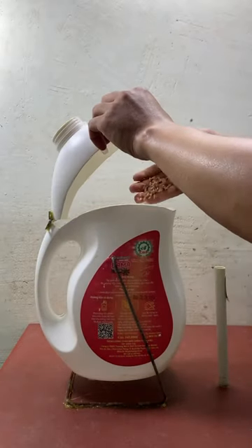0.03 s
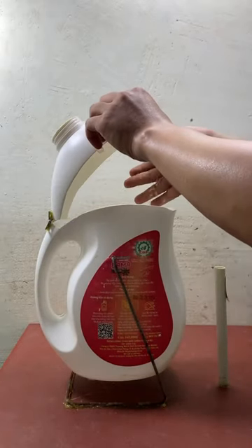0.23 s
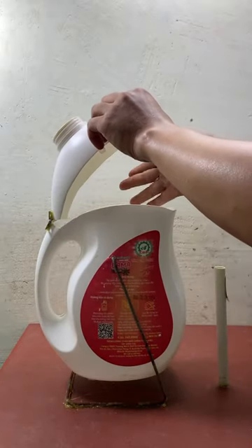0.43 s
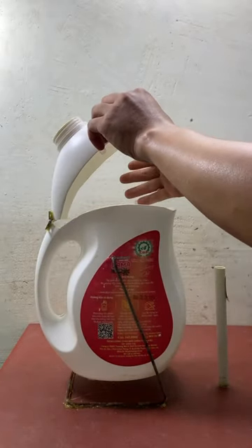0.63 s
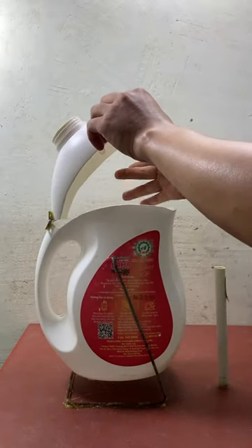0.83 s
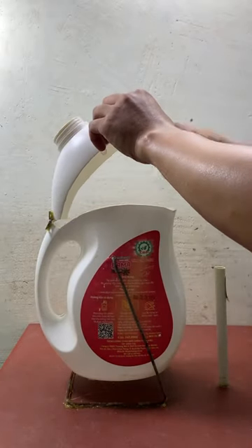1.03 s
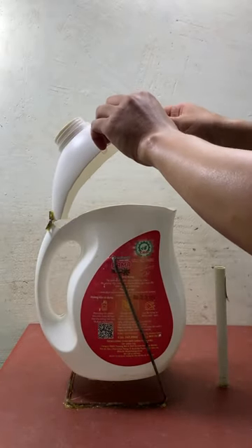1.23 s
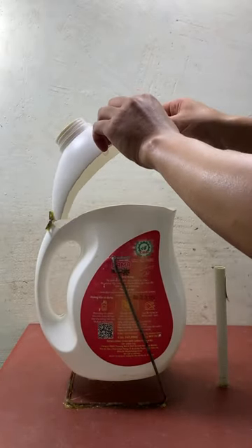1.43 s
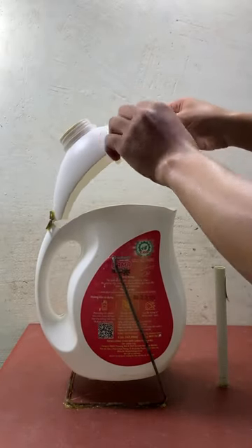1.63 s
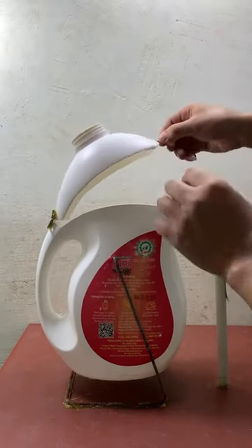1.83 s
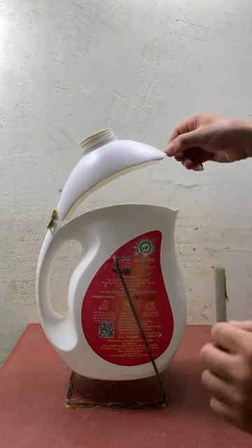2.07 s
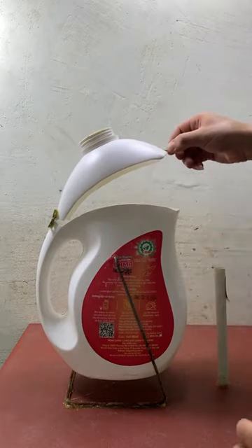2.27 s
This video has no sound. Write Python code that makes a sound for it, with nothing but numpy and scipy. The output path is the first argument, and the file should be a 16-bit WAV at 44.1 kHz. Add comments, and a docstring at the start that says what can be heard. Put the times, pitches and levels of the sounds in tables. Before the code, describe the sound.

At about 0.2 seconds, a handful of hard grains clatters into a hollow plastic bottle, loudest around 0.3 to 0.4 seconds. The rattle fades by 0.7, and a few last grains drop and bounce until about 1.1. Fingers then faintly brush and tap the plastic, with a last tiny tick near 2.2 seconds. A dull arm rustle and low rumble lie underneath in the bare room.

```python
"""A handful of hard grains is tipped into a hollow plastic bottle in a bare room. Each impact is
a short broadband pulse that excites the modes of the shell and of the enclosed air; the growing
heap damps the shell, and a few stragglers drop and bounce. Fingers then brush and tap the
plastic faintly, over a dull rustle of arms and a low background rumble."""
import sys
import numpy as np
from scipy import signal
from scipy.fft import rfft, irfft, next_fast_len
from scipy.io import wavfile
from scipy.ndimage import map_coordinates

SR = 44100
rng = np.random.default_rng(int(sys.argv[2]) if len(sys.argv) > 2 else 0)


def inscribe(sig):
    """Save sig as 16-bit PCM at rate SR to the path in sys.argv[1].

    A 1-D sig is mono; a 2-D sig holds one channel per row.
    Samples are clipped to [-1, 1] before scaling.
    """
    pcm = np.round(np.clip(np.atleast_2d(sig).T, -1, 1) * 32767)
    wavfile.write(sys.argv[1], SR, pcm.astype(np.int16))


N = 101429
TOP_HZ = 15700


def amp(db):
    """Amplitude ratio of a level in decibels."""
    return 10 ** (np.asarray(db) / 20)


def unit(x):
    """Normalisation to rms 1."""
    return x / np.sqrt(np.mean(x ** 2) + 1e-20)


def along(points, hz):
    """Interpolation of (frequency, value) points on a log frequency axis."""
    freqs, values = np.transpose(points)
    return np.interp(np.log(hz + 1), np.log(freqs + 1), values)


def curve(points):
    """Linear interpolation of (time, value) points at every sample."""
    return np.interp(np.arange(N) / SR, *np.transpose(points))


def wobble(rate):
    """Slow random modulation: a spline through `rate` knots a second."""
    return map_coordinates(rng.standard_normal(N // 100), [np.arange(N) * rate / SR], mode="mirror")


def filtered(x, response):
    """Linear filtering: the spectrum times a complex frequency response."""
    size = 2 * next_fast_len(N // 2 + 4096)
    return irfft(rfft(x, size) * response(np.fft.rfftfreq(size, 1 / SR)), size)[..., :x.shape[-1]]


def colour(x, points):
    """Minimum-phase filtering by (frequency, gain) points: a folded cepstrum makes it causal."""
    def response(hz):
        cepstrum = irfft(np.log(amp(along(points, hz))))
        half = len(cepstrum) // 2
        cepstrum[1:half] *= 2
        cepstrum[half + 1:] = 0
        return np.exp(rfft(cepstrum))
    return filtered(x, response)


def resonate(x, modes):
    """Modal superposition: x drives damped second-order resonators in parallel."""
    return filtered(x, lambda f: sum(amp(db) * 1j * f * width / (hz * hz - f * f + 1j * f * width)
                                     for hz, width, db in modes))


def pair(x, correlation):
    """Partial coherence: two independent signals mix as mid and side to a left-right correlation."""
    def weights(hz):
        angle = np.arccos(np.clip(along(correlation, hz), -1, 1)) / 2
        return np.array([np.cos(angle), np.sin(angle)])
    mid, side = filtered(x, weights)
    return np.array([mid + side, mid - side])


# Spectrum of the rumble (frequency [Hz], relative level [dB])
RUMBLE_SPECTRUM = [(15, -44), (28, -19.5), (38, -7), (50, -0.5), (85, -5), (122, -23.5), (160, -13),
                   (220, -10.5), (300, -16), (430, -22), (650, -28), (1400, -42.5), (2500, -58.5),
                   (6000, -66), (13000, -66), (15000, -74.5)]
# Coherence of the rumble (frequency [Hz], left-right correlation [-])
RUMBLE_COHERENCE = [(50, 0.97), (150, 0.9), (400, 0.92), (1200, 0.33), (3000, .2), (10000, 0.15)]
# Partials of a distant drone (frequency [Hz], level [dB])
DRONE_PARTIALS = [(49, -56.5), (158, -67)]

def background(rumble_db=-54):
    """Low-frequency noise, with a drone that wavers by amplitude and phase modulation."""
    t = np.arange(N) / SR
    rumble = unit(pair(colour(rng.standard_normal((2, N)), RUMBLE_SPECTRUM), RUMBLE_COHERENCE))
    drone = sum(amp(db + 2 * wobble(12)) * np.sqrt(2) * np.sin(2 * np.pi * hz * t + 0.66 * wobble(7))
                for hz, db in DRONE_PARTIALS)
    return amp(rumble_db) * rumble + drone


# Decay of the bare room (frequency [Hz], reverberation time T60 [s])
ROOM_T60 = [(200, 0.5), (800, 0.41), (2000, .6), (4000, .65), (8000, 0.49), (14000, .4)]
# Coherence of the reverberant field (frequency [Hz], left-right correlation [-])
ROOM_COHERENCE = [(200, .75), (350, 0.088), (800, .85), (1300, .45), (2500, -.2), (4500, 0.28),
                  (7000, 0.78), (13000, .4)]

def room(x):
    """Reverberation: convolution with a noise tail that decays exponentially, each band at its rate."""
    hz, t, bands = signal.stft(rng.standard_normal((2, SR)), SR, nperseg=256)
    decay = amp(-60 * t / along(ROOM_T60, hz)[:, None])
    tail = pair(signal.istft(bands * decay, SR, nperseg=256)[1], ROOM_COHERENCE)
    tail = np.pad(tail / np.linalg.norm(tail[0]), ((0, 0), (SR // 400, 0)))  # 2.5 ms pre-delay
    return signal.fftconvolve(x[None], tail, axes=1)[:, :N]


# Envelope of the arm rustle (time [s], level [dB])
ARM_ENVELOPE = [(0, -61.5), (.6, -61), (1.0, -64.5), (1.2, -60), (1.5, -61), (1.75, -62), (1.95, -69.5),
                (2.3, -69.5)]
# Spectrum of the arm rustle (frequency [Hz], relative level [dB])
ARM_SPECTRUM = [(120, -29.5), (220, 3), (330, -2.5), (600, -11.5), (1500, -31), (3000, -47), (8000, -69)]

def arms():
    """Amplitude-modulated low noise: the dull rustle of moving arms."""
    return amp(curve(ARM_ENVELOPE)) * unit(colour(rng.standard_normal((2, N)), ARM_SPECTRUM))


WALL_T60_S, TICK_RISE_S = .035, 0.00044
ECHO_WEIGHT, ECHO_T60_S = 3, .028
SNAP_WEIGHT, SNAP_T60_S = 8.6, 0.0045

def ticks(count, samples=1024, modes=10):
    """Impulse responses of unit energy, one a contact: local wall modes, inner echoes and a snap."""
    t = np.arange(samples) / SR
    hz = rng.uniform(0, TOP_HZ, (count, modes))
    phase = (2 * np.pi * hz[..., None] * t).astype(np.float32)
    wall = np.cos(phase).sum(1) * amp(-60 * t / WALL_T60_S)
    echoes = ECHO_WEIGHT * rng.standard_normal((count, samples)) * amp(-60 * t / ECHO_T60_S)
    snap = SNAP_WEIGHT * rng.standard_normal((count, samples)) * amp(-60 * t / SNAP_T60_S)
    pulses = (wall + echoes + snap) * (1 - np.exp(-t / TICK_RISE_S))
    return pulses / np.linalg.norm(pulses, axis=1, keepdims=True)


def place(times, gains, pulses):
    """Superposition of pulses, each at its own time and gain."""
    at = np.round(times * SR).astype(int)[:, None] + np.arange(pulses.shape[1])
    return np.bincount(at.ravel(), (gains[:, None] * pulses).ravel(), N)[:N]


# Spectral shaping of a contact on the wall (frequency [Hz], gain [dB])
TICK_SPECTRUM = [(120, -31), (200, -16), (300, -5), (600, -1.5), (1000, 0.5), (2000, 1), (3000, 2.5),
                 (4200, 2), (5200, 0.5), (7500, 2), (9500, -5.5), (12000, -4), (13800, -9), (15200, -31.5)]
# Spectral shaping of the ringing, thinned below 200 Hz and above 4 kHz (frequency [Hz], gain [dB])
RING_SPECTRUM = [(130, -28), (215, 0), (3500, 0.5), (12000, -17)]

def bottle(times, gains, rings):
    """Impact excitation: contacts tick and drive each (modes, dB per contact); two sides radiate."""
    def side():
        pulses = ticks(len(times))
        ringing = np.zeros(N)
        for modes, drive_db in rings:
            ringing += resonate(place(times, gains * amp(drive_db), pulses), modes)
        return colour(place(times, gains, pulses), TICK_SPECTRUM) + colour(ringing, RING_SPECTRUM)
    return np.array([side(), side()])


# Envelope of skin sliding on plastic (time [s], level [dB])
BRUSH_ENVELOPE = [(0, -90), (.08, -87), (.13, -91), (.19, -90), (.3, -82), (.95, -78), (1.08, -78.5),
                  (1.2, -82), (1.35, -76.5), (1.43, -89), (1.66, -93), (1.72, -86), (1.85, -93),
                  (1.98, -86.5), (2.1, -91.5), (2.3, -91)]
# Spectrum of that friction (frequency [Hz], relative level [dB])
BRUSH_SPECTRUM = [(300, -7.5), (1500, 7.5), (3500, 0), (5000, 2), (7500, -3), (12000, -2.5), (15000, -10)]
# Fingertip impacts, the two 3400 Hz rows near 1.72 s a brief scrape played alike (time [s], relative level
# [dB], centre frequency [Hz])
FINGER_TAPS = [(1.124, -52.5, 1234), (1.18, -67.5, 3000), (1.268, -55.5, 795), (1.331, -63, 1580),
               (1.341, -63.5, 1620), (1.69, -58.5, 1330), (1.718, -77, 3400), (1.745, -77, 3400)]
# Fingernail impacts (time [s], relative level [dB])
NAIL_TICKS = [(1.393, -78), (1.767, -83.5), (2.156, -75)]
TAP_T60_S, TAP_RISE_S, TAP_RELATIVE_WIDTH = 0.031, 0.0052, 0.21

def fingers():
    """Friction and light impact: skin brushes, soft taps ring a damped band, nails tick sharply."""
    brush = unit(colour(rng.standard_normal((2, N)), BRUSH_SPECTRUM))
    skin = amp(curve(BRUSH_ENVELOPE) + 2.5 * wobble(40)) * brush
    for start, db, hz in FINGER_TAPS:
        age = np.maximum(np.arange(N) / SR - start, 0)
        mode = [(hz, TAP_RELATIVE_WIDTH * hz, 0)]
        ring = unit(resonate(resonate(rng.standard_normal((2, N)), mode), mode))
        skin += 2 * amp(db - 60 * age / TAP_T60_S) * (1 - np.exp(-age / TAP_RISE_S)) * ring
    nail_times, nail_db = np.transpose(NAIL_TICKS)
    return skin + bottle(nail_times, 20 * amp(nail_db), rings=[])


# Modes of the plastic shell (frequency [Hz], bandwidth [Hz], gain [dB])
SHELL_MODES = [(833.3, 16, 20.5), (863.6, 12, 13), (906, 30, 4), (1060, 50, -2.5), (1270, 21, 1),
               (1538, 44, 0), (1902, 36, 5.5), (2127, 35, 9), (2438, 29, 3.5), (2903, 60, 7)]
# Modes of the enclosed air (frequency [Hz], bandwidth [Hz], gain [dB])
AIR_MODES = [(211.6, 16, 8.5), (272.2, 7.1, 24), (324, 24, 19), (443.4, 12, 7.5), (512, 12, 1),
             (586.6, 21, 4)]
# Modes of bare wall struck hard (frequency [Hz], bandwidth [Hz], gain [dB])
KNOCK_MODES = [(330, 50, -3), (860, 110, -1), (1540, 90, 7), (2000, 120, 0.5)]
# Grains that stand out (time [s], relative level [dB], shell and air drive [dB], knock drive [dB])
SINGLE_GRAINS = [(.1965, -44, -5.5, -15), (.2045, -41.5, -5, -8), (.2245, -32.5, -10.5, -16),
                 (.2627, -39.5, 5, -1), (.293, -40, 7.5, 2.5), (.3235, -37, -6, -1.5),
                 (.3605, -35.5, -5, -4), (.393, -32.5, -5, -5), (.485, -38.5, -5, -7.5),
                 (.502, -40, -6.5, -10.5), (.5295, -37.5, -5.5, 5), (.654, -47.5, -6, -6),
                 (.722, -52, -3.5, 10), (.7735, -43, -1, 5), (.7765, -47, -4, 5), (.8425, -49.5, -6.5, -4),
                 (.8985, -55, -1, -13), (.9335, -54, -6, -26), (.956, -61, -5, -19), (1.018, -71, -10, -11),
                 (1.088, -70.5, -13, -10)]
FIRST_FLIGHT_S, RESTITUTION, BOUNCE_LOSS_DB = .017, .7, 10.5

def bouncing_grains(contacts=3):
    """Inelastic rebound: each flight of a single grain is shorter and each impact weaker."""
    starts, db, ring_db, knock_db = np.transpose(SINGLE_GRAINS)
    bounce = np.arange(contacts)
    first_flight = FIRST_FLIGHT_S * rng.uniform(.6, 1.4, (len(starts), 1))
    shrink = RESTITUTION ** bounce
    times = starts[:, None] + first_flight * (np.cumsum(shrink) - shrink)
    gains = 20 * amp(db[:, None] - BOUNCE_LOSS_DB * bounce)
    rings = [(list(SHELL_MODES) + list(AIR_MODES), np.repeat(ring_db, contacts)),
             (KNOCK_MODES, np.repeat(knock_db, contacts))]
    return bottle(times.ravel(), gains.ravel(), rings)


# Envelope of the clatter as the grains flow (time [s], relative level [dB])
POUR_ENVELOPE = [(.196, -42.5), (.215, -44), (.25, -40), (.264, -33), (.295, -30), (.312, -36), (.328, -33),
                 (.372, -36), (.392, -32), (.415, -37.5), (.465, -41), (.485, -39), (.55, -44), (.585, -46),
                 (.625, -54), (.66, -51), (.70, -65), (.76, -73.5)]
PEAK_HITS_PER_S, RATE_EXPONENT, SCATTER_DB = 1200, .5, 3.5
SHELL_DB, SHELL_FALL_DB_PER_S = 2, 17
AIR_DB, AIR_RISE_DB_PER_S = -4, 11  # relative to the clatter

def pour():
    """Shot noise: more flow brings more and harder impacts; the heap mutes the shell, the air rings on."""
    t, level_db = np.arange(N) / SR, curve(POUR_ENVELOPE)
    start, end = POUR_ENVELOPE[0][0], POUR_ENVELOPE[-1][0]
    rate = PEAK_HITS_PER_S * amp(RATE_EXPONENT * (level_db - level_db.max()))
    hits_so_far = np.cumsum(rate * (t > start) * (t < end)) / SR
    jitter, size_draw = rng.random((int(hits_so_far[-1]), 2)).T
    at = np.searchsorted(hits_so_far, np.arange(len(jitter)) + jitter)
    size = unit(amp(-SCATTER_DB * np.log(np.maximum(size_draw, .03))))  # many small, a few large
    gains = size * amp(level_db[at]) * np.sqrt(SR / rate[at])  # incoherent impacts add in power
    age = t[at] - start
    rings = [(SHELL_MODES, SHELL_DB - SHELL_FALL_DB_PER_S * age),
             (AIR_MODES, AIR_DB + AIR_RISE_DB_PER_S * age)]
    return bottle(t[at], gains, rings)


# Coherence of the unevenly radiating shell (frequency [Hz], left-right correlation [-])
DIRECT_COHERENCE = [(200, 0.97), (1500, .9), (2700, 0.54), (4300, .65), (6500, 0.78), (13000, .9)]
# Phase difference between the channels (frequency [Hz], lead of the left [rad])
PHASE_LEAD = [(100, 0), (300, -0.72), (700, 1), (1500, .2), (2300, 1.34), (3000, 1.74), (3800, 0.3),
              (4700, 3), (5800, 4.5), (6500, 7), (7500, 6.5), (8500, 7.5), (9600, 9), (11000, 11),
              (11800, 12), (13000, 12), (14300, 16.5)]
# Level difference between the channels (frequency [Hz], left minus right [dB])
LEVEL_DIFFERENCE = [(60, 1), (250, -5), (800, -1), (1600, -1), (2200, -2.5), (4000, -0.5), (6000, 0)]

def scene(room_db=-5):
    """Direct and reverberant fields add, and reach left and right with unequal phase and level."""
    def left_right(hz):
        log_ratio = 1j * along(PHASE_LEAD, hz) + np.log(amp(along(LEVEL_DIFFERENCE, hz)))
        return np.exp(np.array([[.5], [-.5]]) * log_ratio)
    ambience = background()
    direct = arms() + fingers() + bouncing_grains() + pour()
    field = pair(direct, DIRECT_COHERENCE) + amp(room_db) * room(direct[0])
    return filtered(field, left_right) + ambience


def record(dry):
    """Band limiting: an ideal low-pass filter at TOP_HZ."""
    return filtered(dry, lambda hz: hz < TOP_HZ)


dry = scene()
out = record(dry)
inscribe(out)
```